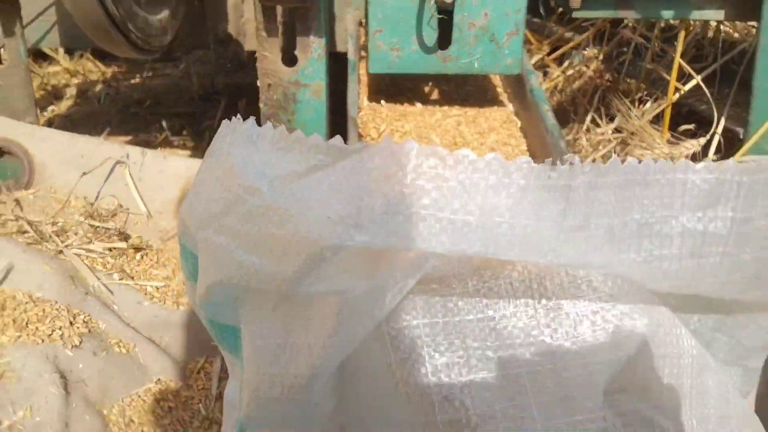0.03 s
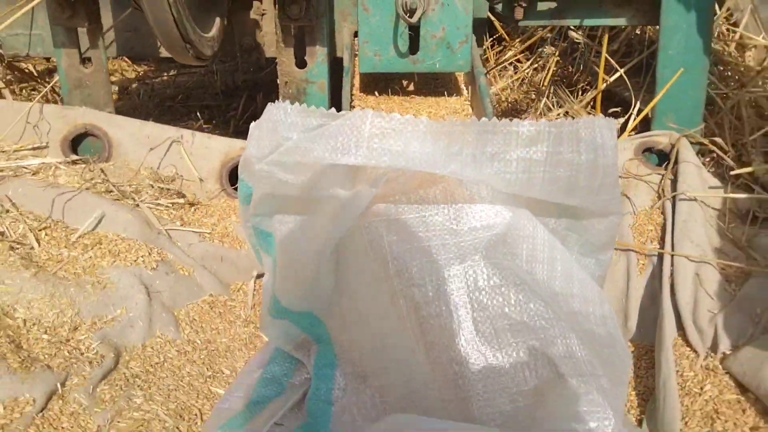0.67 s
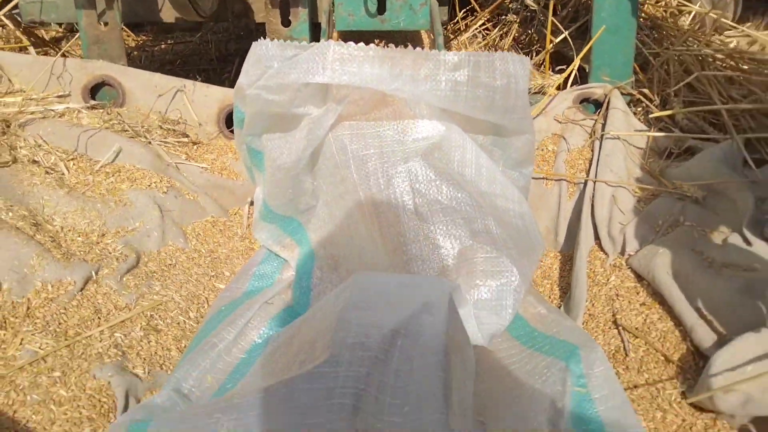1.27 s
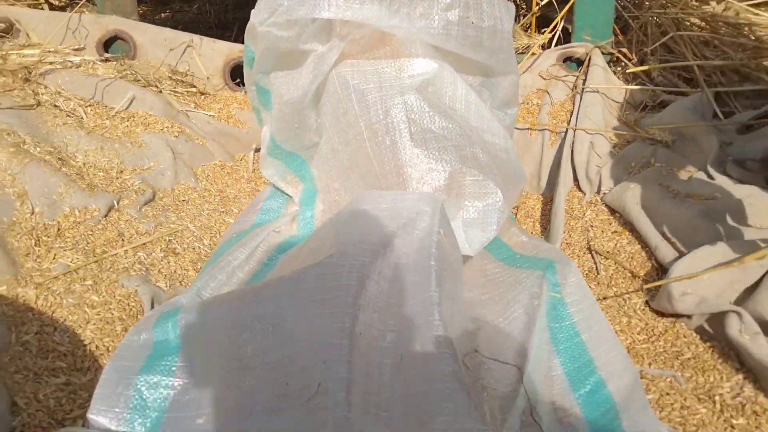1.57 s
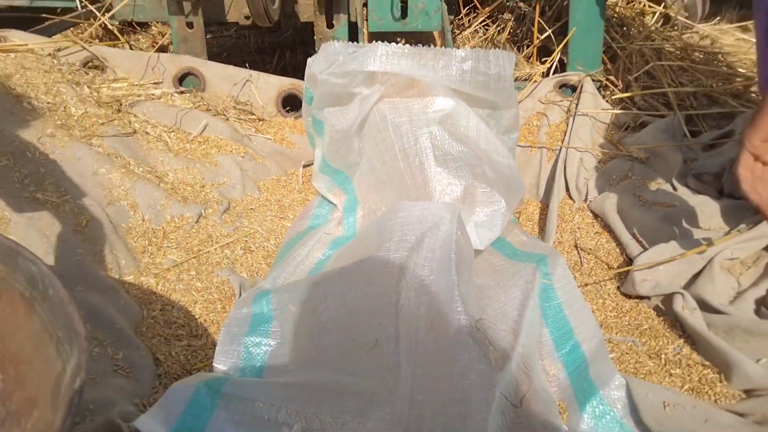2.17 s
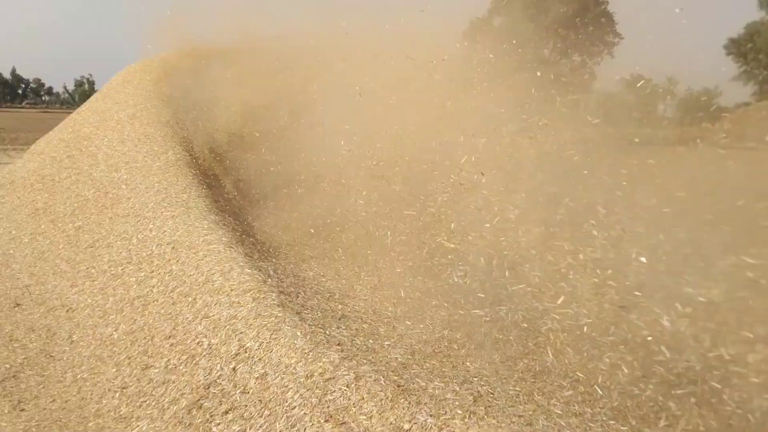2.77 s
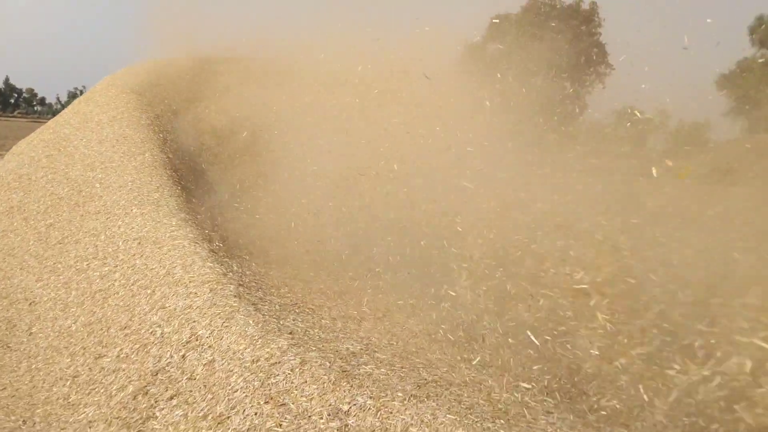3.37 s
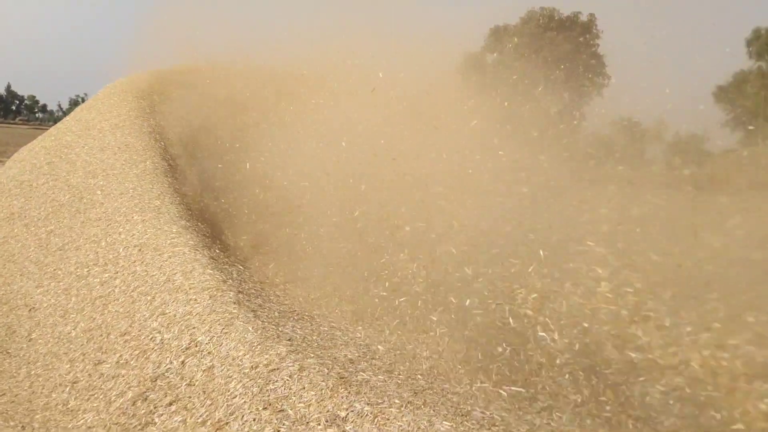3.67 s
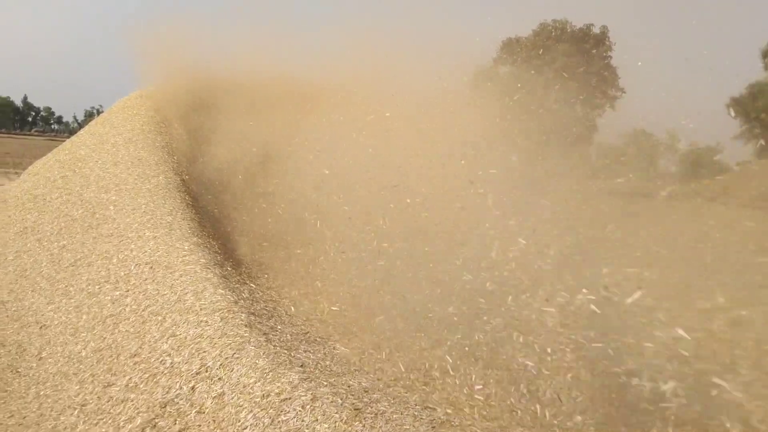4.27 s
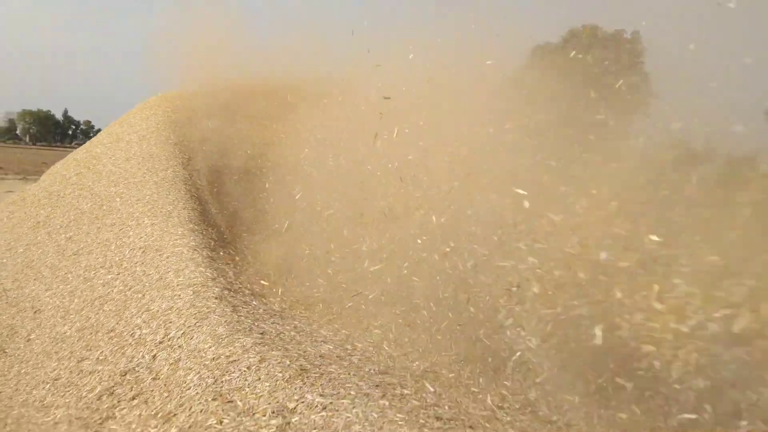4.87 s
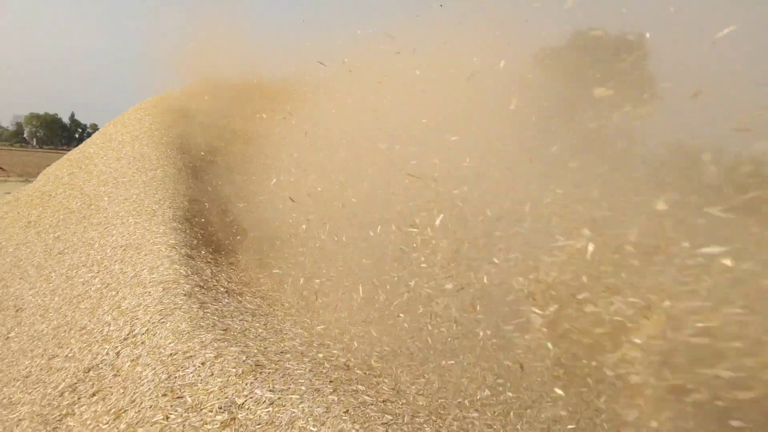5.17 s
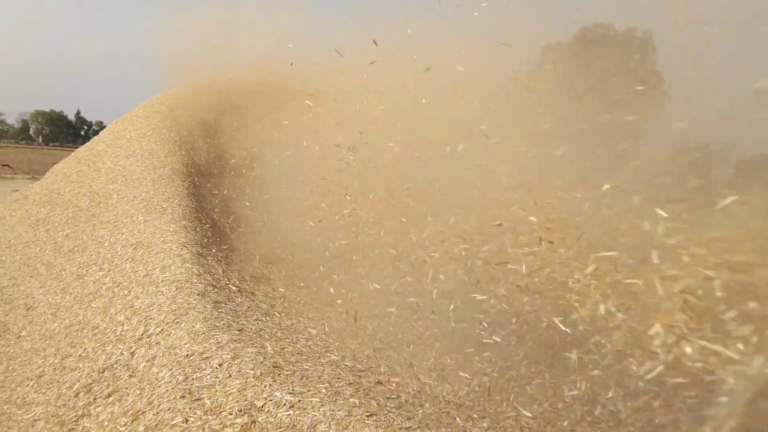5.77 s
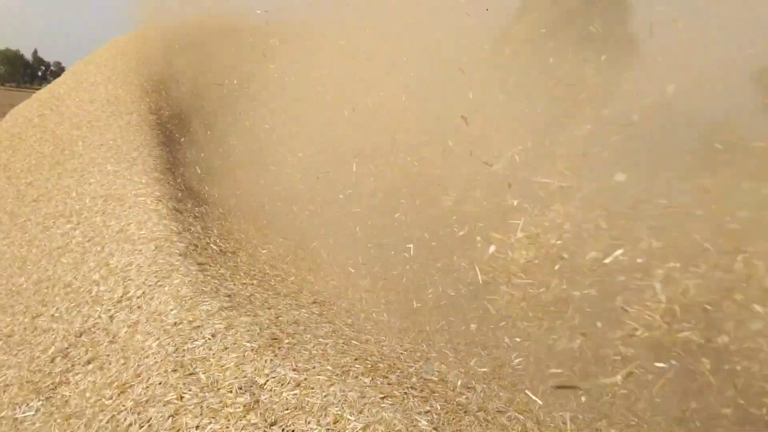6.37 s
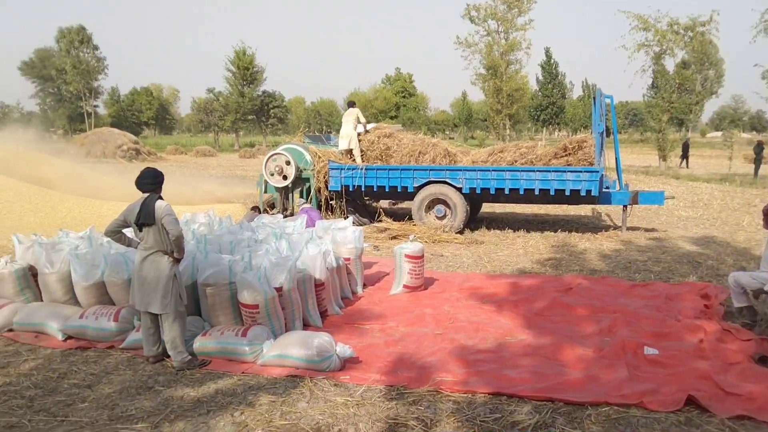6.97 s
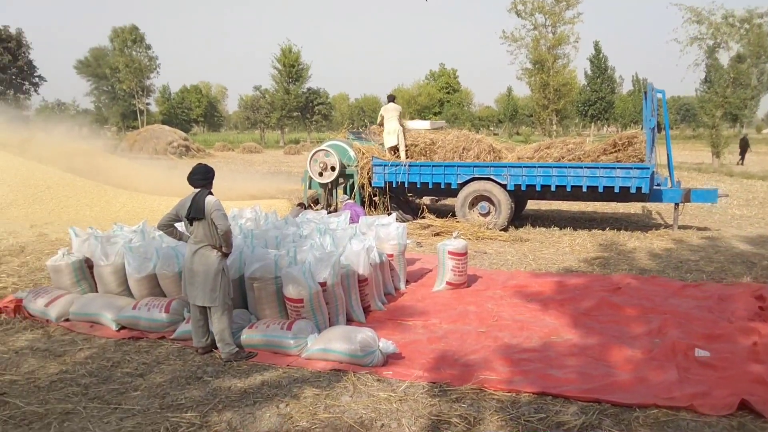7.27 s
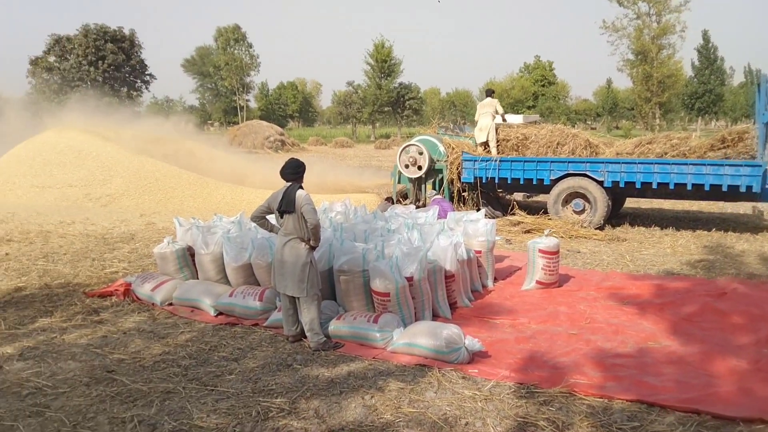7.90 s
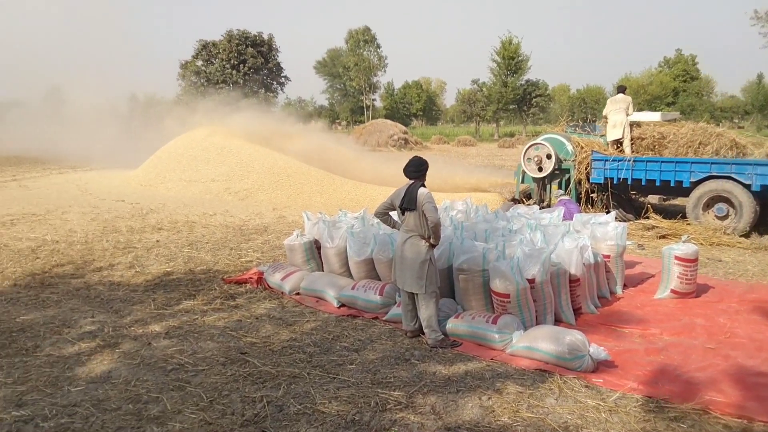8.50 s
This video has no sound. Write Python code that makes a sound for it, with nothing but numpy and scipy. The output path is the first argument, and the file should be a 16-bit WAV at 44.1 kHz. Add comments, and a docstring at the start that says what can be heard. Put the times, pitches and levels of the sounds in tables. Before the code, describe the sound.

Close to a running grain thresher, flying straw hisses and patters over a roaring drum, a gritty rush of air and a steady tractor engine. Grain sizzles, and wads of straw clack now and then. About three seconds in, the tone changes and the engine sits slightly lower. Near the end it cuts out for an instant and fades back in from across the field, softer.

```python
"""A tractor-driven wheat thresher in an open field, heard from three places in turn: at the grain
spout, beside the chaff heap and, after a short break, from across the yard. The drum roars as it takes
an uneven feed of crop, the blower rushes and flying straw hisses, while the diesel drones and puffs
and its belts drive whirring tones. Grain sizzles down the spout, wads of straw clack on the beaters,
flung kernels tick and the wind gives a few low bumps."""
import sys
import numpy as np
from scipy import signal
from scipy.fft import rfft, irfft, next_fast_len
from scipy.io import wavfile
from scipy.ndimage import uniform_filter1d

SR = 44100
rng = np.random.default_rng(int(sys.argv[2]) if len(sys.argv) > 2 else 0)


def materialize(psi):
    """Save the field psi as 16-bit PCM at rate SR to the path in sys.argv[1].

    A 1-D psi becomes a single channel; in a 2-D psi each row is a channel.
    """
    bounded = np.clip(np.atleast_2d(psi).T, -1, 1)
    quanta = np.round(bounded * 32767).astype(np.int16)
    wavfile.write(sys.argv[1], SR, quanta)


N = 376613
TIME = np.arange(N) / SR
SPOUT, HEAP, YARD = range(3)
LEAVE_SPOUT_S, BLEND_S, LEAVE_HEAP_S, REACH_YARD_S = 2.772, .02, 6.612, 6.642

# likeness of left and right in the noise, one table a place: f/Hz, coherence
COHERENCE = [
    [(200, 1), (400, 0.77), (620, 0.82), (950, 0.55), (1500, 0.091), (5000, 0.063)],
    [(60, 0.5), (300, 0.9), (700, 0.8), (1100, 0.75), (1600, 0.38), (2300, 0.49), (6000, 0.089)],
    [(90, 0.86), (190, 1), (300, 1), (470, 0.95), (590, 0.38), (850, 0.87), (1500, 0.35), (2300, 0.39),
     (5000, 0.072)],
]
# direction of the rig, one row a place: lag of the left side/ms, drone left minus right/dB
DIRECTION = [(0, 0), (.47, 5), (.03, 0)]


def amp(db):
    """Decibels to gain."""
    return 10 ** (np.asarray(db) / 20)


def unit(x):
    """Scales to rms 1."""
    return x / np.sqrt(np.mean(x ** 2) + 1e-20)


def unit_mid(x, lo_hz=0):
    """Scales a stereo sound so that its mid signal has rms 1 above lo_hz."""
    size = next_fast_len(x.shape[1])
    above = irfft(rfft(x.mean(0), size) * (np.fft.rfftfreq(size, 1 / SR) >= lo_hz))
    return x / (above.std() + 1e-12)


def spectrum(rows, hz, column=1):
    """One column of a spectrum table, joined on a log-frequency axis."""
    rows = np.array(rows, float)
    return np.interp(np.log(hz + 1), np.log(rows[:, 0] + 1), rows[:, column])


def curve(rows, t):
    """A time table, joined by straight lines."""
    return np.interp(t, *np.transpose(rows))


def bump(t, s, length):
    """A smooth swell of height 1 around time s."""
    return np.exp(-(2 * (t - s) / length) ** 2)


def wander(t, fastest_hz, slowest_hz=.01):
    """Random modulation of rms about 1, moving mostly between the two rates."""
    grid = np.arange(4096) / 400
    hz = np.fft.rfftfreq(len(grid), grid[1])
    shape = hz / np.hypot(hz, slowest_hz) / np.hypot(1, (hz / fastest_hz) ** 2)
    return np.interp(t, grid, unit(irfft(rfft(rng.standard_normal(len(grid))) * shape)))


def band(x, lo_hz, hi_hz):
    """Gentle band-pass."""
    return signal.sosfilt(signal.butter(2, [lo_hz, hi_hz], "band", fs=SR, output="sos"), x)


def air_noise(t, place, colour, patch_db, patch_hz, patch_s=.06):
    """Stereo noise with a grainy flutter: short, narrow spectral patches swell and fade at random."""
    size, hop = 2048, 512
    hz, frames = np.fft.rfftfreq(size, 1 / SR), len(t) // hop + 5
    shape = (2, frames, len(hz))
    left, apart = rng.standard_normal(shape) + 1j * rng.standard_normal(shape)
    alike = np.clip(spectrum(COHERENCE[place], hz), 0, 1)
    lead = np.exp(2j * np.pi * hz * DIRECTION[place][0] / 1000)
    right = (alike * left + np.sqrt(1 - alike ** 2) * apart) * lead
    patches = uniform_filter1d(rng.standard_normal(shape), round(patch_s * SR / hop), 1)
    patches = unit(uniform_filter1d(patches, round(patch_hz * size / SR), 2))
    colour_db = np.array([spectrum(colour, hz), spectrum(colour, hz, column=2)])[:, None]
    edge_cut = (1 + (colour[0][0] / (hz + 1)) ** 40) * (1 + (hz / colour[-1][0] / 1.02) ** 40)
    bins = np.array([left, right]) * amp(colour_db + patch_db * patches) / np.sqrt(edge_cut)
    return signal.istft(bins.swapaxes(1, 2), nperseg=size, noverlap=size - hop)[1][:, :len(t)]


def wind():
    """Low bumps of wind, different on each side."""
    # gusts: t/s, length/s, left level/dB, right level/dB
    gusts = [(2.789, 0.025, -15, -26), (4.97, 0.19, -24, -27), (5.3, 0.19, -21, -27),
             (7.81, 0.17, -32, -24)]
    swell = sum(amp([[left], [right]]) * bump(TIME, s, length) for s, length, left, right in gusts)
    return swell * unit(band(rng.standard_normal((2, N)), 104, 243))


def kernel_ticks(decay_s=.0007):
    """Single flung kernels snap against something hard."""
    # kernel hits: t/s, left peak/dB, right peak/dB
    hits = [(2.133, -22, -13), (5.449, -9, -17), (7.29, -23, -12), (7.522, -20, -17)]
    out, age = np.zeros((2, N)), TIME[:SR // 100]
    for s, left_db, right_db in hits:
        snap = band(rng.standard_normal((2, len(age))) * np.exp(-age / decay_s), 2000, 12000)
        at = round(s * SR)
        out[:, at:at + len(age)] += amp([[left_db], [right_db]]) * snap / abs(snap).max()
    return out


def beater_knocks(decay_s=0.0048, right_db=-7):
    """The beaters strike a hard wad of straw: a dry clack that dies at once in the casing."""
    # wads of straw: t/s, starting level on the left/dB
    wads = [(.978, -17), (1.498, -24), (1.975, -22), (2.509, -19), (2.679, -19), (3.329, -26), (3.498, -17),
            (4.043, -17), (4.217, -18), (4.264, -25), (4.858, -28), (5.254, -19.5), (6.19, -20)]
    out, age = np.zeros((2, N)), TIME[:SR // 20]
    for s, db in wads:
        clack = unit(band(rng.standard_normal((2, len(age))), 750, 3600)) * np.exp(-age / decay_s)
        at = round(s * SR)
        out[:, at:at + len(age)] += amp([[db], [db + right_db]]) * clack
    return out


def grain_chute(band_hz=(6580, 7410), flicker_db=2.03, left_db=-12):
    """Grain slides down the steel spout with a narrow sizzle that grows as the listener moves."""
    # envelope of the sizzle: t/s, level on the right/dB
    envelope = [(0, -31), (.45, -29.5), (.9, -24.5), (2.2, -24), (2.75, -27.5)]
    sizzle = unit(band(band(rng.standard_normal((2, N)), *band_hz), *band_hz))
    db = curve(envelope, TIME) + flicker_db * wander(TIME, 24)
    return amp([db + left_db, db]) * sizzle


def patter(t, per_s=420, spread_db=3.5):
    """Kernels and bits of straw strike close by: tiny clicks, a few of them large."""
    sizes = amp(spread_db * np.minimum(rng.exponential(1, (2, len(t))), 4))
    return unit(band(sizes * (rng.random((2, len(t))) < per_s / SR), 2400, 17000))


def stalk_grit(t, per_s=900, spread_db=2.0, cycles=8):
    """Dry stalks snap in the drum and blower: short pitched grains."""
    out, age = np.zeros((2, len(t))), TIME[:SR // 200]
    pitches = np.geomspace(3000, 6600, num=16)
    for hz in pitches:
        sizes = amp(spread_db * np.minimum(rng.exponential(1, out.shape), 3))
        snaps = sizes * (rng.random(out.shape) < per_s / len(pitches) / SR)
        ring = np.sin(2 * np.pi * hz * age) * np.exp(-2 * age * hz / cycles)
        out += signal.oaconvolve(snaps, [ring], axes=1)[:, :len(t)]
    return unit(out)


def belt_whirr(t, place, firing_hz, shake=0.47, drift_hz=0.97):
    """Drum and fan tones follow the engine through slipping belts, and fade or grow as one moves."""
    # tones, one table a place: f at mean speed/Hz, relative level/dB, slope/(dB/s)
    tones = [
        [(469, -16.5, -2.5), (509, -18.5, -5.5), (598, -19, -4.5), (1085, -28, 0.5)],
        [(274, -15.5, -2.5), (290, -12, 0.5), (313, -13, 0.5), (436, -12.5, 0)],
        [(82.5, -3.5, 1), (123.7, -8, 1), (287, -12.5, 1), (441, -15.5, -1), (878, -10.5, -5)],
    ]
    out = np.zeros(len(t))
    for hz, db, db_per_s in tones[place]:
        slip = drift_hz * np.sqrt(hz / 500) * wander(t, 3.35)
        pitch = hz * firing_hz / firing_hz.mean() + slip
        tone = unit((1 + shake * wander(t, 12)) * np.sin(2 * np.pi * np.cumsum(pitch) / SR))
        out += amp(db + db_per_s * (t - t.mean())) * tone
    return out


def exhaust_puffs(place, firings, firing_hz, decay_cycles=0.33, spread_db=2.0, labour_db_per_hz=8):
    """Each firing blows a rough puff of gas of its own strength, louder as the engine labours and sags."""
    # puff noise, one row a place: low f/Hz, high f/Hz, level at mean speed/dB
    puff_bands = [(118, 270, -30), (166.5, 202, -35.5), (100, 260, -46)]
    lo_hz, hi_hz, db = puff_bands[place]
    stroke = firings.astype(int)
    strength = amp(spread_db * rng.standard_normal(1000))[stroke]
    gas = strength * np.exp(-(firings - stroke) / decay_cycles) * rng.standard_normal(len(firings))
    sag_hz = firing_hz.mean() - firing_hz
    return amp(db + labour_db_per_hz * sag_hz) * unit(band(gas, lo_hz, hi_hz))


def exhaust_note(t, place, firings, flutter=0.046, jitter_cycles=0.0027):
    """A four-cylinder diesel; unequal cylinders add a chug of lines at quarters of the firing rate."""
    # partials, one table a place: multiple of the firing rate, relative level/dB
    partials = [
        [(1, -10), (1.5, -11.5), (1.75, -17.5), (2, 1), (2.25, -14.5), (2.5, -13), (2.75, -23), (3, -3.5),
         (3.25, -17), (3.5, -21), (4, -9.5), (4.25, -23.5), (4.5, -21), (4.75, -20), (5, -13), (5.5, -23.5),
         (6, -26), (10, -23)],
        [(1, -8), (1.5, -14.5), (1.75, -19), (2, 1.5), (2.25, -18), (2.5, -19), (3, -7.5), (3.25, -15.5),
         (3.5, -16), (3.75, -17), (4, -13), (5, -5), (5.25, -9), (5.5, -7.5), (6, -16), (6.5, -14.5)],
        [(1, -12.5), (2, 0), (3, -13.5), (4, -12), (5, -17), (6, -21)],
    ]
    firings = firings + jitter_cycles * wander(t, 6.5)
    note = np.zeros(len(t))
    for order, db in partials[place]:
        strength = amp(db) * (1 + flutter * order * wander(t, 11))  # higher partials are less steady
        note += strength * np.sqrt(2) * np.cos(2 * np.pi * (order * firings + rng.random()))
    return note


def tractor(t, place, firings, firing_hz, tone_gain):
    """Exhaust note, belt whirr and puffs as one drone, panned by level and delay."""
    tones = exhaust_note(t, place, firings) + belt_whirr(t, place, firing_hz)
    drone = tone_gain * tones + exhaust_puffs(place, firings, firing_hz)
    lag_ms, left_db = DIRECTION[place]
    early = np.interp(t + lag_ms / 1000, t, drone)
    return np.array([amp(left_db / 2) * drone, amp(-left_db / 2) * early])


def straw_hiss(t, place, patter_db):
    """Flying straw: a bright hiss, peaking near 8.5 kHz on the right, flecked with patter."""
    # hiss colour, one table a place: f/Hz, relative level left/dB, right/dB
    colours = [
        [(5350, -24, -14), (6130, -9, -7.5), (6300, -22, -9), (6970, -17, -7), (7700, -14, -1.5),
         (8250, -16, 2), (8770, -11.5, 3.5), (10600, -9.5, -5), (11700, -10, -9.5), (14400, -15, -10),
         (16000, -26, -9)],
        [(5400, -20, -14), (6000, -16, -9), (6500, -16, -8.5), (7900, -15, -1.5), (8660, -14.5, 2.2),
         (9130, -14, 2.5), (9927, -16, -3), (11600, -10.5, -8.5), (13500, -17, -6.5), (16000, -29, -6.5)],
        [(5550, -27, -19), (7300, -27, -7.5), (7960, -27, -0.2), (8730, -27, 0.5), (9400, -26, -6.5),
         (10600, -26, -13.5), (11200, -28, -21.5), (12300, -24, -19.5), (14400, -34, -18.5), (15900, -48, -16)],
    ]
    hiss = air_noise(t, place, colours[place], patch_db=2.5, patch_hz=300, patch_s=.035)
    return unit_mid(hiss) + amp(patter_db) * patter(t)


def blower_rush(t, place, grit_db):
    """The blower drives out the chaff: a midrange rush of air, gritty with snapping stalks."""
    # rush colour, one table a place: f/Hz, relative level left/dB, right/dB
    colours = [
        [(1072, 5.5, 0.5), (1240, -4.5, -5), (1450, 0.5, -2.5), (1730, -4.5, -10.5), (1990, -2.5, -8.5),
         (2590, -7.5, -10.5), (4030, -9.5, -9.5), (5520, -15.5, -13)],
        [(1083, 1, -6), (1390, 0.5, -7), (1760, -1.5, -12), (2150, -5, -9.5), (2900, -6.5, -12.5),
         (3460, -11.5, -12), (3900, -8, -10.5), (4930, -13, -10), (5850, -11.5, -10)],
        [(1130, -8, -4.5), (1410, -7, -11), (1810, -11.5, -3.5), (1920, -15, -10), (2290, -8.5, 0.5),
         (2460, -9, -1), (2540, -17, -11.5), (2890, -16, -1), (3400, -15, -9), (3560, -14, -4.5),
         (4140, -21, -11), (4370, -22, -20.5), (5040, -27, -14), (5600, -27, -12)],
    ]
    rush = air_noise(t, place, colours[place], patch_db=2.5, patch_hz=250)
    return unit_mid(rush) + amp(grit_db) * stalk_grit(t)


def drum_roar(t, place):
    """The spinning threshing drum: a low, rough roar."""
    # roar colour, one table a place: f/Hz, relative level left/dB, right/dB
    colours = [
        [(25, -20, -15), (61, -11, -24), (80, -9, -2.5), (150, -12.5, -8), (174, -5, -2), (400, -11, -16),
         (440, -6.5, -12), (462, -6, -24), (546, -13.5, -14), (630, -4.5, -9), (670, -10.5, -16),
         (1016, -12, -16.5)],
        [(25, -17, -17), (46, -8, -21), (116, -4.5, -26), (143, -10, -15), (203, 0.5, -7.5), (218, -7, -6),
         (250.9, -14, -19), (269, -6.5, -5.5), (307, -4.5, -10), (337, -3.5, -10), (409, -4.5, -25),
         (419, -1, -5.5), (495, -7, -18), (1063, -11.5, -17.5)],
        [(25, -17, -16), (35, -19, -16), (115, -5.5, -5.5), (165, -6.5, -7), (214, -10.5, -5.5),
         (313, -11, -11.5), (456, -5.5, -4.5), (537, -20, -19), (603, -12.5, -20.5), (800, -8.5, -6.5),
         (866, -7, -3), (925, -8.5, -11), (1030, -12, -8), (1080, -20, -15)],
    ]
    return unit_mid(air_noise(t, place, colours[place], patch_db=1.0, patch_hz=200), lo_hz=174)


def faders(t, place, turn_s=7.74, turn_length_s=0.29, turn_rush_db=-1.5, turn_hiss_db=-3):
    """Gains of tones, roar, rush and hiss: steady but for the crop and the listener's movement."""
    # base levels, one row a place: tones/dB, roar/dB, rush/dB, hiss/dB
    mix = [(-21.5, -25.5, -29.5, -23.5), (-25, -24.5, -30.5, -23.5), (-33, -33.5, -32, -24.5)]
    # drift as the listener moves, one row a place: slope/(dB/s) of the same four
    drift = [(0.22, -0.36, -0.27, -0.26), (0.62, -.15, -0.087, -0.17), (.1, -.1, -0.46, 0.2)]
    # armfuls of crop swell the noise, gaps thin it: t/s, length/s, roar/dB, rush/dB, hiss/dB
    feed = [(0.622, 0.3, 2.5, 1, 1.5), (0.996, 0.076, 1, 3.5, 1), (1.3, 0.26, 1.7, 1.5, 1),
            (1.834, 0.15, -0.5, -0.5, -1.2), (1.963, .1, .5, 0, 0), (2.224, .1, -1.5, -1.5, -2),
            (2.4, 0.56, 1.5, 0.2, 0.5), (2.732, 0.05, -4, -1, -2), (2.904, .12, -2.5, -1, 0.5),
            (3.14, .1, 1, 2, 1), (3.26, 0.12, -1, -2, 0.3), (3.49, .1, 1, 1.2, 0), (3.7, 0.21, 0, -0.2, -1),
            (4.026, 0.12, -2, 0.5, 1.5), (4.122, .06, 0.5, 0.2, -.5), (4.248, 0.14, 2, 1.5, 0),
            (4.5, 0.4, 0, 0.5, 1.5), (4.79, 0.099, 0.5, 0, -2), (4.92, .12, 0, -0.5, -0.5),
            (5.124, 0.18, -1.5, -2.5, -1), (5.3, 0.17, 2, 1, 1), (5.73, 0.13, 2, 1.5, 0.7),
            (6.23, 0.073, 2.5, 1, 0.5), (6.344, 0.099, -2, -0.5, 0), (6.55, .1, 0, -1.3, -1.5)]
    tones, roar, rush, hiss = (db + slope * (t - t.mean()) for db, slope in zip(mix[place], drift[place]))
    crop = sum(np.outer(dbs, bump(t, s, length)) for s, length, *dbs in feed)
    turned = np.clip((t - turn_s) / turn_length_s, 0, 1)  # turning away in the yard dulls the treble
    rush += crop[1] + turn_rush_db * turned
    hiss += crop[2] + turn_hiss_db * turned
    return amp([tones, roar + crop[0], rush, hiss])


def thresher(place, start, end, chug, clump_db, flicker_db, flurry_db, patter_db, grit_db):
    """The whole rig from one place: tractor drone under drum roar, blower rush and straw hiss."""
    # engine speed (steady, sagging under load, recovering), one table a place: t/s, firing rate/Hz
    speeds = [
        [(0, 55.95), (2.7, 56.12)],
        [(2.85, 52.35), (3.7, 52.65), (4.85, 52.44), (5.35, 51.7), (5.85, 51.4), (6.6, 51.92)],
        [(6.9, 52.0), (7.7, 52.18), (8.5, 52.73)],
    ]
    stay = (TIME > start - BLEND_S) & (TIME < end + BLEND_S)
    t = TIME[stay]
    tone_gain, roar_gain, rush_gain, hiss_gain = faders(t, place)
    firing_hz = curve(speeds[place], t)
    firings = np.cumsum(firing_hz) / SR
    # roar and rush swell with each firing
    beat = 1 + chug * (np.cos(2 * np.pi * firings) + 0.6 * np.cos(4 * np.pi * firings))
    clumps = clump_db * wander(t, 15, 2.6)  # clumps of straw pass through the drum
    flicker = flicker_db * np.array([wander(t, 15, 3), wander(t, 24, 4.3)])  # each side has its own air
    # straw and grain arrive in flurries, steadier on the right
    flurries = np.array([flurry_db * wander(t, 14, 2), 0.6 * wander(t, 22, 3)])
    drone = tractor(t, place, firings, firing_hz, tone_gain)
    roar = roar_gain * amp(clumps) * beat * drum_roar(t, place)
    rush = rush_gain * amp(clumps + flicker) * np.sqrt(beat) * blower_rush(t, place, grit_db)
    hiss = hiss_gain * amp(.3 * clumps + flurries) * straw_hiss(t, place, patter_db)
    out = np.zeros((2, N))
    out[:, stay] = drone + roar + rush + hiss
    return out


def scene():
    """The spout blends into the heap; the yard fades in after a break, smoother for its distance."""
    spout = thresher(SPOUT, 0, LEAVE_SPOUT_S, chug=0.077, clump_db=1.0, flicker_db=1.0,
                     flurry_db=2, patter_db=-17, grit_db=-13.5)
    heap = thresher(HEAP, LEAVE_SPOUT_S, LEAVE_HEAP_S, chug=0.036, clump_db=1.1, flicker_db=0.25,
                    flurry_db=2.1, patter_db=-15, grit_db=-11)
    yard = thresher(YARD, REACH_YARD_S, TIME[-1], chug=.05, clump_db=-0.44, flicker_db=0.25,
                    flurry_db=1, patter_db=-28, grit_db=-22)
    blend = np.clip((TIME - LEAVE_SPOUT_S) / BLEND_S + .5, 0, 1)
    cut = np.clip((LEAVE_HEAP_S - TIME) / 0.0036, 0, 1)
    tail = 0.061 * np.exp(-abs(TIME - LEAVE_HEAP_S) / 0.011)
    fade_in = np.clip((TIME - REACH_YARD_S) / 0.31, 0, 1) ** 0.64  # fastest at first
    close = (spout + grain_chute()) * np.sqrt(1 - blend) + heap * np.sqrt(blend) * (cut + tail)
    return close + yard * fade_in + wind() + kernel_ticks() + beater_knocks()


def record(dry, edge_hz=15950):
    """A steep low-pass trims the very top of the hiss."""
    return signal.oaconvolve(dry, signal.firwin(601, edge_hz, window=("kaiser", 9), fs=SR)[None], "same")


dry = scene()
out = record(dry)
materialize(out)
```